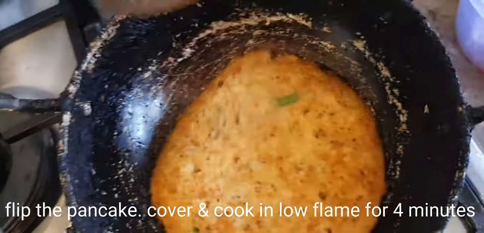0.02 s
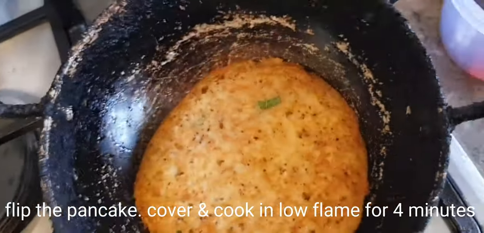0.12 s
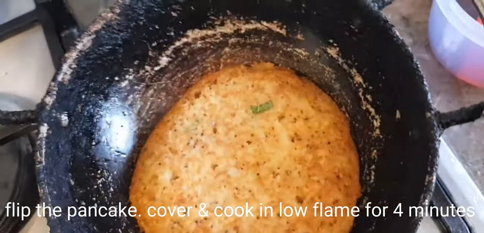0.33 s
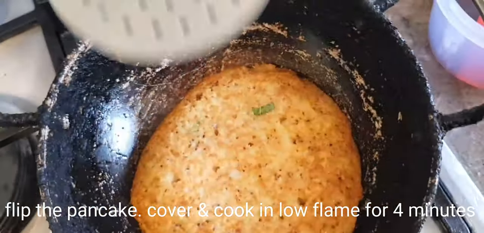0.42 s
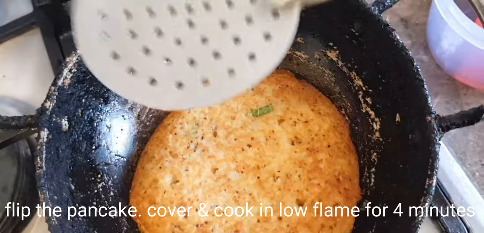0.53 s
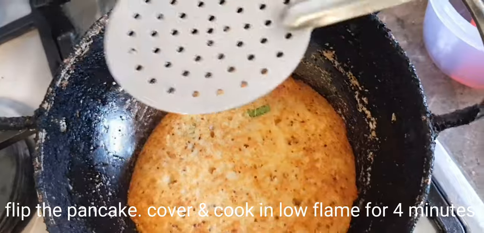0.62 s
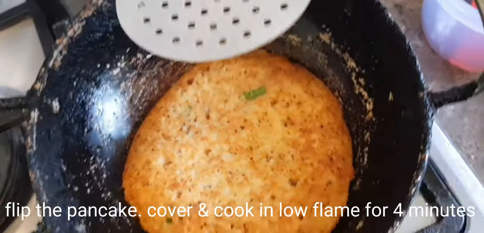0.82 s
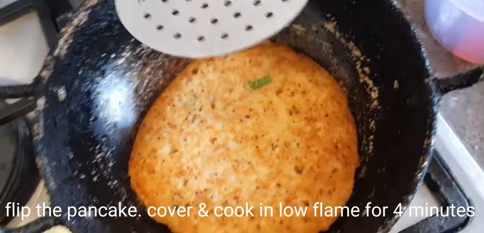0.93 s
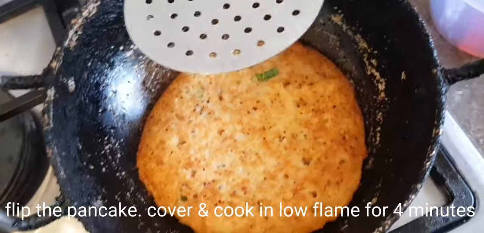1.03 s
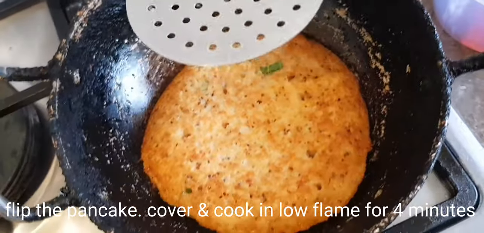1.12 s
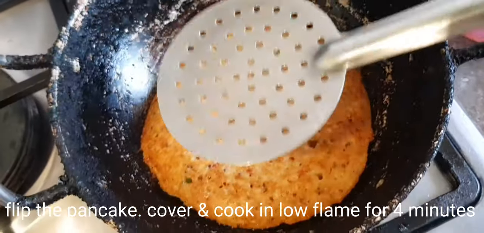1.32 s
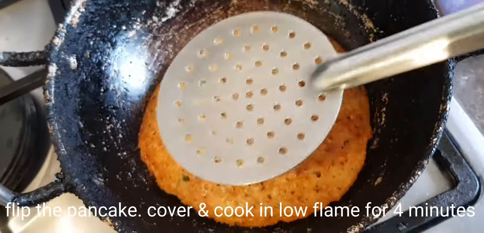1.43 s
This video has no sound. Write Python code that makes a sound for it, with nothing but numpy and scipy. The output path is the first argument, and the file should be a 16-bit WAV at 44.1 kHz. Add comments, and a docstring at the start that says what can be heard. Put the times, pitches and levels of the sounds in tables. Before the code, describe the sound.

Loud sizzle as a thick pancake flops into hot oil, with a dull thud and spits

```python
"""A gas flame rumbles low and hisses faintly; then a thick pancake is flipped into a hot oiled pan.
Its edge touches and the oil hisses at once; the body slaps down, the pan thuds, the rest flops after it.
The wet side sizzles, slowly calming, with single spits of oil.
Flame and hiss are filtered noise, the crackle is thousands of tiny ringing bursts, the thuds are
decaying pan modes under wet noise slaps, and each spit is a noisy snap with a fizzing tail."""
import sys
import numpy as np
from scipy import signal
from scipy.fft import rfft, irfft
from scipy.io import wavfile

SR = 44100
rng = np.random.default_rng(int(sys.argv[2]) if len(sys.argv) > 2 else 0)


def to_wav(sig):
    """Store sig (one row per channel, or 1-D mono) as 16-bit WAV at the path in sys.argv[1].

    Samples outside -1..1 are clipped; the rate is SR.
    """
    pcm = np.clip(np.atleast_2d(sig), -1, 1) * 32767
    pcm = np.round(pcm).astype(np.int16)
    wavfile.write(sys.argv[1], SR, pcm.T)  # frames by channels


N = 66150
T = np.arange(N) / SR   # time in seconds
CUTOFF_HZ = 15450   # top of the spits and of the whole scene


def from_db(db):
    """Decibels to gain."""
    return 10 ** (np.asarray(db) / 20)


def rms_one(x):
    """Scale to rms 1."""
    return x / np.sqrt(np.mean(x ** 2) + 1e-20)


def at_hz(points, hz):
    """Read a table on a log-frequency axis."""
    table_hz, values = np.transpose(points)
    return np.interp(np.log(hz + 1), np.log(table_hz), values)


def band(x, low_hz, high_hz, order=2):
    """Causal band-pass."""
    high_hz = min(high_hz, .48 * SR)
    sos = signal.butter(order, [low_hz, high_hz], "band", fs=SR, output="sos")
    return signal.sosfilt(sos, x)


def colour(x, spectrum):
    """Filter a sound by a table of gains over frequency; rms 1."""
    gain = from_db(at_hz(spectrum, np.fft.rfftfreq(N, 1 / SR)))
    return rms_one(irfft(rfft(x) * gain, N))


def stereo_noise():
    """White noise, nearly alike left and right in the bass and less so in the treble."""
    # left-right likeness: frequency_hz, correlation (0-1)
    likeness = [(100, 0.95), (300, 0.93), (600, 0.44), (1000, 0.91), (2000, 0.21), (4000, 0), (12000, 0.45)]
    mid, side = rfft(rng.standard_normal((2, N)))
    alike = np.clip(at_hz(likeness, np.fft.rfftfreq(N, 1 / SR)), -1, 1)
    return irfft(np.sqrt(1 + alike) * mid + np.sqrt(1 - alike) * side * [[1], [-1]], N)


def drift(rate_hz):
    """Slow random wander of rms 1: white noise through two equal one-pole low-passes."""
    r = np.exp(-2 * np.pi * rate_hz / SR)
    wander = signal.lfilter([1], [1, -2 * r, r * r], rng.standard_normal(2 * N))
    return rms_one(wander[N:])   # the first half lets the filter settle


def blow(start_s, rise_s, t60_s):
    """Envelope of a blow: quick rise, exponential fall."""
    age = np.maximum(T - start_s, 0)
    return (1 - np.exp(-age / rise_s)) * np.exp(-np.log(1000) * age / t60_s)


def echoes(x, t60_s, level_db):
    """Diffuse reflections that die away, different left and right."""
    age = T[:SR // 2]
    tail = rng.standard_normal((2, len(age))) * np.exp(-np.log(1000) * age / t60_s)
    tail *= age > .001   # no reflection in the first millisecond
    tail /= np.sqrt(np.sum(tail ** 2, axis=1, keepdims=True))
    return from_db(level_db) * signal.fftconvolve(x, tail, axes=1)[:, :N]


def flame():
    """The gas jet: a steady faint hiss and a thin whistle over a wavering rumble."""
    # colour of the burning gas: frequency_hz, relative_level_db
    flame_colour = [(20, -32), (30, -23), (70, 2), (125, -5), (270, -17), (430, -28.5), (880, -12),
                    (1300, -21), (1900, -14), (3200, -24), (4600, -12.5), (6200, -19), (7300, -13.5),
                    (8500, -16.5), (15500, -13.5)]
    flame_db, flutter_db, flutter_hz = -46.5, 0.5, 16
    whistle_hz, whistle_width_hz, whistle_db = 7407, 120, -66

    burn = from_db(flame_db) * colour(stereo_noise(), flame_colour)
    rumble = signal.sosfiltfilt(signal.butter(2, 200, fs=SR, output="sos"), burn)
    half_hz = whistle_width_hz / 2
    whistle = rms_one(band(stereo_noise(), whistle_hz - half_hz, whistle_hz + half_hz))
    waver = from_db(flutter_db * drift(flutter_hz)) - 1   # change in gain of the rumble alone
    return burn + from_db(whistle_db) * whistle + rumble * waver


def spits():
    """A larger droplet of oil snaps, then fizzes away: two noises cut off below the droplet's pitch."""
    # oil spits: start_s, snap_db (rms if packed into 1 ms), lowest_hz, snap_t60_s, left_right_db,
    # fizz_db (noise level ahead of its envelope)
    spit_table = [(.7728, -25, 8000, .012, 1, -58), (.7742, -18, 6500, .009, 1, -55),
                  (.7952, -18, 6000, .006, -5, -48), (.9597, -28, 8000, .003, 9, -58),
                  (.986, -28.5, 9000, .002, -8, -58), (1.0703, -30, 9000, .006, 1, -45),
                  (1.0848, -28, 8000, .003, 2, -50), (1.1205, -28, 10000, .004, 4, -41),
                  (1.1412, -29, 3000, .008, -2, -43), (1.2032, -25, 9000, .004, 0, -55),
                  (1.2297, -27, 8500, .003, 3, -58), (1.3176, -28.5, 8000, .006, 6, -58),
                  (1.3272, -27.5, 8500, .005, 7, -43), (1.3351, -20.5, 1400, .003, 1, -42),
                  (1.375, -29, 8000, .003, 7, -45), (1.3905, -29.5, 8500, .003, 3, -52),
                  (1.48, -29, 7500, .007, 4, -38)]
    fizz_t60_s = 0.15
    out = np.zeros((2, N))
    for start_s, snap_db, low_hz, snap_t60_s, pan_db, fizz_db in spit_table:
        snap = rng.choice([-1, 1], N) * blow(start_s, .00005, snap_t60_s)
        snap = band(snap, low_hz, CUTOFF_HZ, order=1)
        snap *= np.sqrt(.001 * SR / np.sum(snap ** 2))
        fizz = rms_one(band(stereo_noise(), low_hz, CUTOFF_HZ))
        fizz *= blow(start_s, 0.00086, fizz_t60_s)
        spit = from_db(snap_db) * snap + from_db(fizz_db) * fizz
        out += spit * from_db([[pan_db / 2], [-pan_db / 2]])
    return out


def bursts(per_s, spread_db, pan_db, low_hz, high_hz, cycles, count=16):
    """Bubbles burst at random: clicks of varied size and place ring resonators of several pitches."""
    out = np.zeros((2, N))
    for hz in np.linspace(low_hz, high_hz, count):
        size = from_db(spread_db * np.minimum(rng.exponential(1, N), 3.5)) * rng.choice([-1, 1], N)
        struck = rng.random(N) < per_s / count / SR
        place = from_db(pan_db / 2 * rng.standard_normal(N) * [[1], [-1]])
        clicks = size * struck * place
        clicks[1] = np.roll(clicks[1], rng.integers(-10, 11))   # left-right lag, in samples
        r = np.exp(-np.log(1000) * hz / (cycles * SR))   # falls 60 dB in this many cycles
        zeros = [np.sqrt(1 - r), 0, -np.sqrt(1 - r)]
        poles = [1, -2 * r * np.cos(2 * np.pi * hz / SR), r * r]
        out += signal.lfilter(zeros, poles, clicks + 1e-18)
    return rms_one(out)


def flickering_noise(count=12):
    """Hiss in noise bands whose levels flicker independently."""
    flicker_db, flicker_hz = 3.07, 54.6
    white = rfft(stereo_noise())
    edges_hz = np.geomspace(1000, 16000, count)
    which = np.searchsorted(edges_hz, np.fft.rfftfreq(N, 1 / SR))
    out = np.zeros((2, N))
    for k in range(count + 1):
        out += irfft(white * (which == k), N) * from_db(flicker_db * drift(flicker_hz))
    return out


def sizzle():
    """Water flashes to steam under the batter: hiss, crackle and pops, with the bowl's hollow note."""
    # vigour of the frying: time_s, relative_level_db
    vigour = [(.195, -27.5), (.212, -29.5), (.24, -27.5), (.30, -30.5), (.39, -34), (.47, -32.5),
              (.60, -36.5), (.66, -34.5), (.75, -38), (.85, -37.5), (.94, -39), (1.03, -41), (1.14, -40),
              (1.24, -40.5), (1.30, -41.5), (1.37, -38.5), (1.41, -40.5), (1.5, -38.5)]
    # colour of hiss and crackle: frequency_hz, relative_gain_db
    sizzle_colour = [(200, -34), (450, -17), (680, -15.5), (1400, -11.5), (1800, -7.5), (2150, -12),
                     (2850, -3), (3400, -8.5), (4200, -3), (6400, -6), (7700, -5.5), (8700, -4),
                     (11000, -0.5), (13600, -2.6), (15200, 1)]
    contact_s, flash_s = 0.1921, 0.0033   # batter meets oil; rise of the hiss
    # levels in the mix, ahead of the vigour: merged far bursts, distinct near ones, fat close pops, bowl
    hiss_db, crackle_db, pops_db, bowl_db = 1, -0.5, -8, -14
    bowl_hz, bowl_width_hz = 999, 244   # air resonance of the pan's bowl
    sputter_db, sputter_hz = 0.59, 32.5   # quick unevenness of the whole sizzle

    vigour_db = np.interp(T, *np.transpose(vigour))
    busy = from_db((vigour_db - vigour_db.mean()) / 2)   # bursts thin out as the frying calms
    hiss = from_db(hiss_db) * colour(flickering_noise(), sizzle_colour)
    crackle = bursts(3500 * busy, spread_db=2, pan_db=2, low_hz=1650, high_hz=15800, cycles=3.1)
    crackle = from_db(crackle_db) * colour(crackle, sizzle_colour)
    pops = bursts(420 * busy, spread_db=0, pan_db=10, low_hz=5170, high_hz=15000, cycles=2.4)
    half_hz = bowl_width_hz / 2
    bowl = from_db(bowl_db) * rms_one(band(stereo_noise(), bowl_hz - half_hz, bowl_hz + half_hz))

    frying = hiss + crackle + from_db(pops_db) * pops
    inside_pan = echoes(frying, t60_s=0.064, level_db=-3)   # sound bouncing inside the pan
    level = from_db(vigour_db + sputter_db * drift(sputter_hz))
    onset = np.clip((T - contact_s) / flash_s, 0, 1)
    return (frying + inside_pan + bowl) * level * onset


def landing():
    """Each part slaps wetly and pushes the pan into its low modes; the main slap also knocks the wall."""
    # parts of the pancake landing: start_s, thud_db (added to each mode), thud_pitch_ratio,
    # splat_db (ahead of envelope and clumps), splat_t60_s
    landings = [(0.1957, -40, 1.14, -51, 0.081), (0.204, -19, 0.8, -34, 0.24),
                (0.247, -2.5, 0.97, -18, 0.23), (0.3046, -21.5, 1.1, -32, 0.13),
                (0.328, -14.5, 0.98, -37, 0.26), (0.397, -33.5, .66, -39, 0.088),
                (.43, -29.5, 0.9, -50, 0.26)]
    # low modes of the loaded pan on its support: pitch_hz (at ratio 1), relative_level_db, t60_s
    pan_modes = [(38.5, -38, 1), (78.84, -26.5, 0.65), (122.2, -13.5, 0.23), (142, 3.5, 0.17),
                 (149.6, -4.5, 0.35), (192.7, -11.5, 0.17), (259.8, -28.5, .3), (305, -25.5, 0.38),
                 (381.3, -31.5, 0.36)]
    # knock of the pan's wall: pitch_hz, level_db (ahead of envelope), t60_s
    knock_modes = [(488.7, -28, 0.23), (528.6, -39.5, 0.19), (534, -42.5, 0.51), (652, -24, 0.043),
                   (716, -28.5, 0.2), (875, -28, 0.18), (980, -16.5, 0.052), (1032, -30, 0.086)]
    # wet slap and squeezed-out air: frequency_hz, relative_level_db
    splat_colour = [(28, -33), (60, 13.5), (170, -1), (310, 6), (420, 0), (520, -1), (720, -1.5),
                    (980, -6.5), (1300, -14.5), (1900, -9.5), (3000, -11.5), (8000, -26), (15000, -43)]
    thud_rise_s, knock_s, knock_rise_s = 0.021, .2468, 0.0031
    clump_db, clump_hz = 2, 60   # the wet slap comes in uneven clumps

    thud, slap = np.zeros(N), np.zeros(N)
    for start_s, thud_db, pitch, splat_db, splat_t60_s in landings:
        slap += from_db(splat_db) * blow(start_s, 0.0012, splat_t60_s)
        for hz, mode_db, ring_s in pan_modes:
            swing = np.sin(2 * np.pi * hz * pitch * (T - start_s))
            thud -= from_db(thud_db + mode_db) * blow(start_s, thud_rise_s, ring_s) * swing
    for hz, mode_db, ring_s in knock_modes:
        ring = np.sin(2 * np.pi * (hz * T + rng.random()))
        thud += from_db(mode_db) * blow(knock_s, knock_rise_s, ring_s) * ring
    clumps = from_db(clump_db * drift(clump_hz))
    splat = slap * clumps * colour(stereo_noise(), splat_colour)
    # the slap lingers dully in the kitchen
    boom = echoes(band(splat, 57, 380), t60_s=0.38, level_db=-11.5)
    return thud + splat + boom


def scene():
    """The pan above the flame, the whole a little louder on the left and the pan later on the right."""
    left_db, right_lag_s = 0.6, 0.00014   # left_db is added left and taken off right
    snaps = spits()
    kitchen = echoes(snaps, t60_s=.25, level_db=-13)
    left, right = sizzle() + landing() + snaps + kitchen
    lag_s = round(right_lag_s * SR) / SR   # whole samples
    pan = np.array([left, np.interp(T - lag_s, T, right)])
    return (pan + flame()) * from_db([[left_db], [-left_db]])


def record(dry):
    """The top is cut steeply by an elliptic low-pass."""
    return signal.sosfilt(signal.ellip(12, .1, 90, CUTOFF_HZ, fs=SR, output="sos"), dry)


dry = scene()
out = record(dry)
to_wav(out)
```